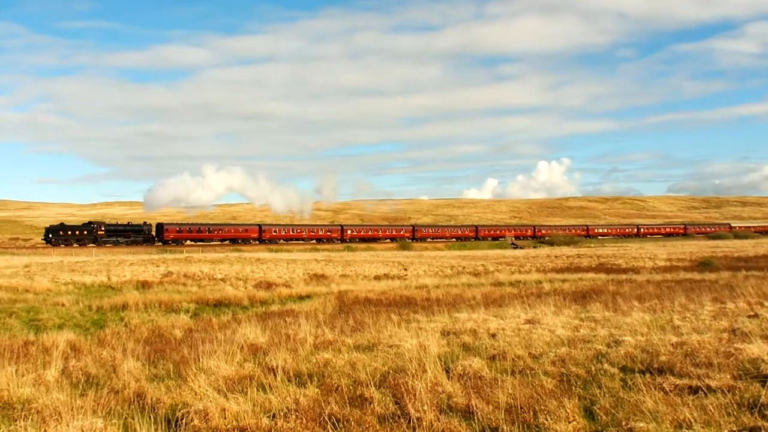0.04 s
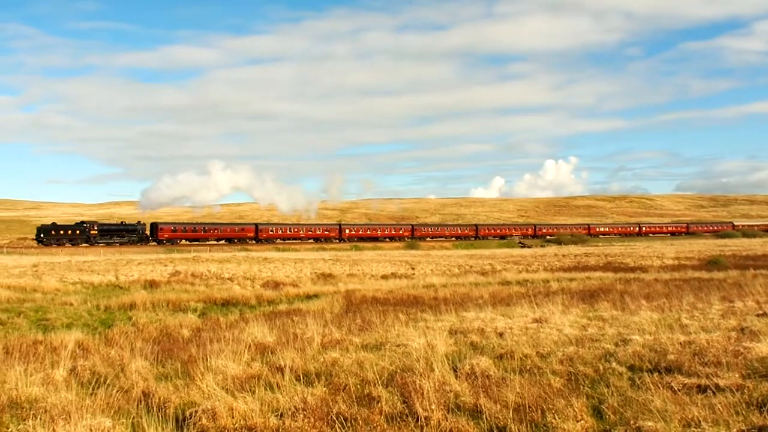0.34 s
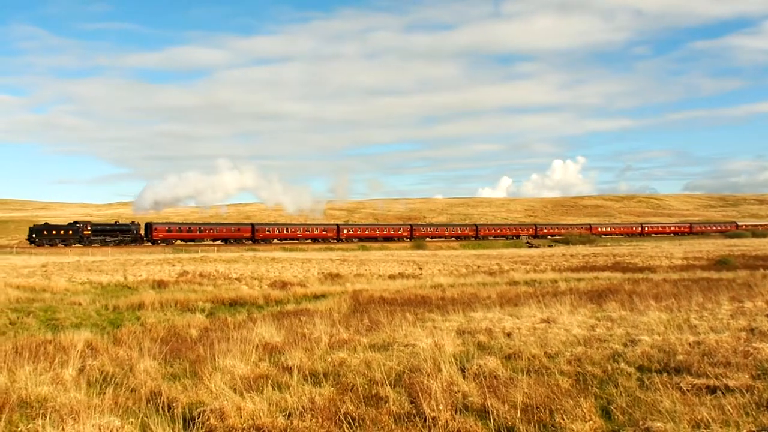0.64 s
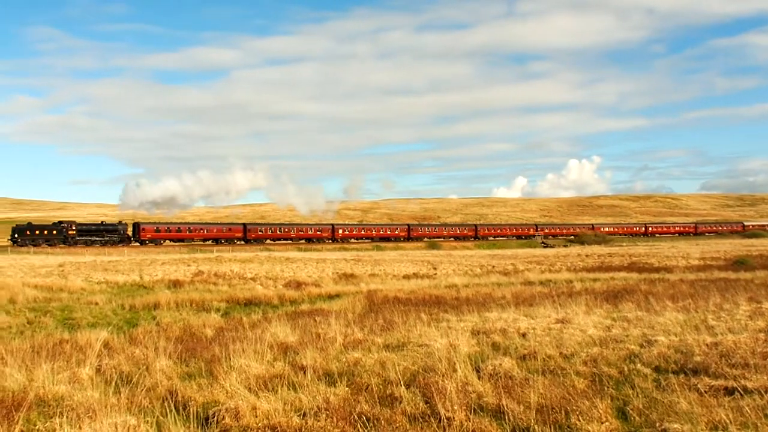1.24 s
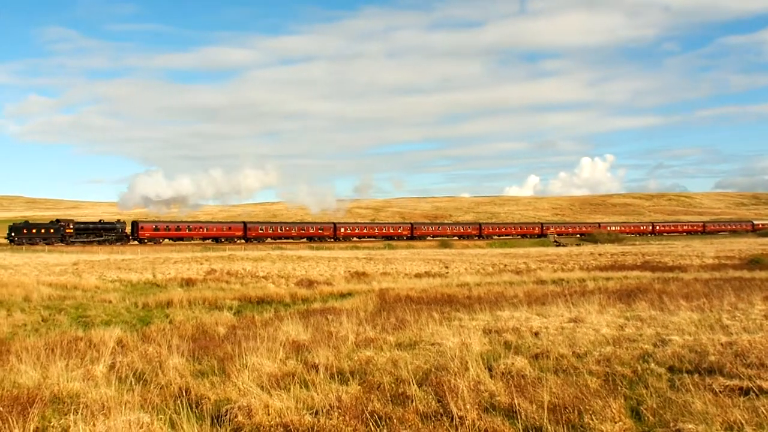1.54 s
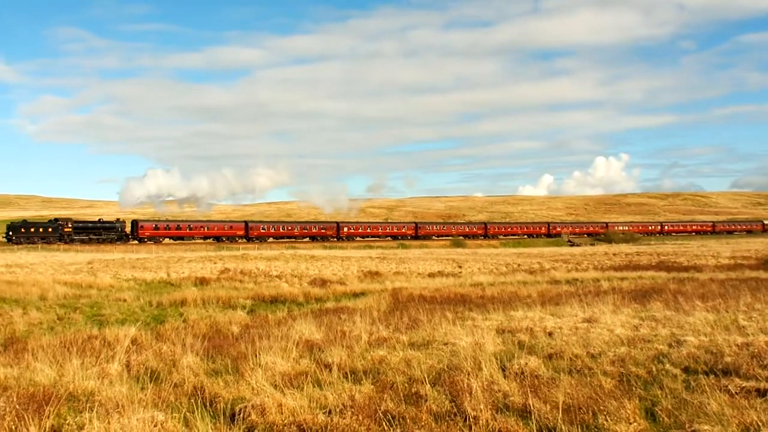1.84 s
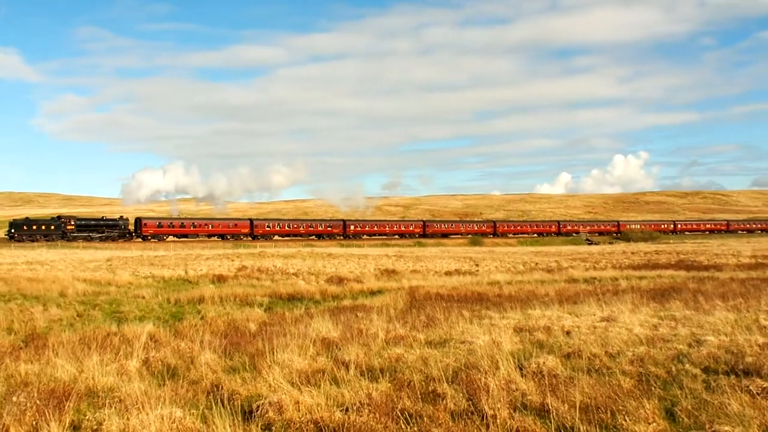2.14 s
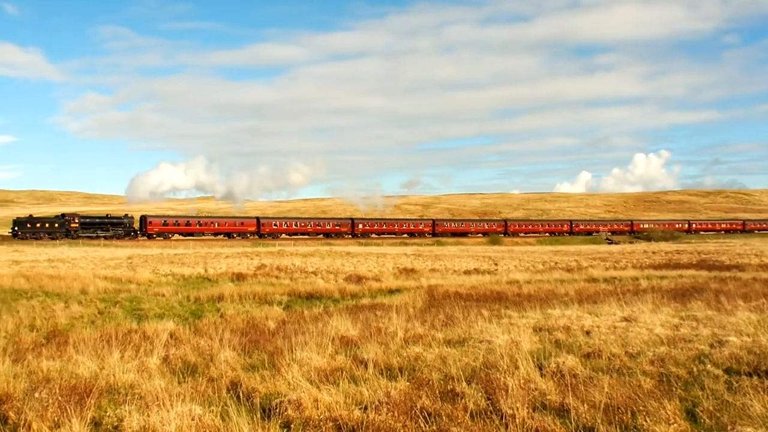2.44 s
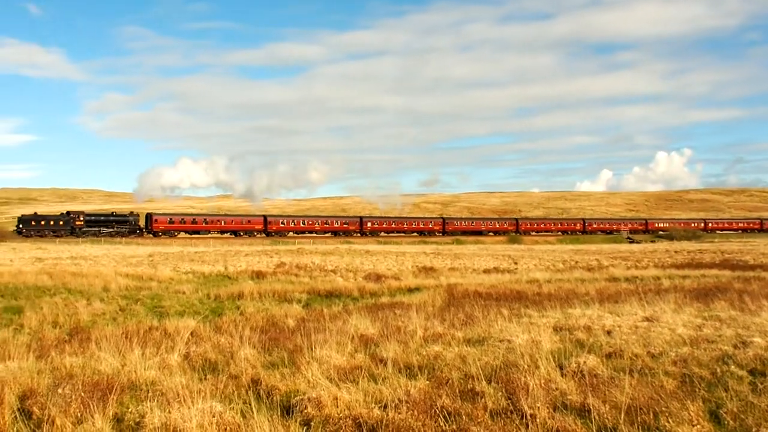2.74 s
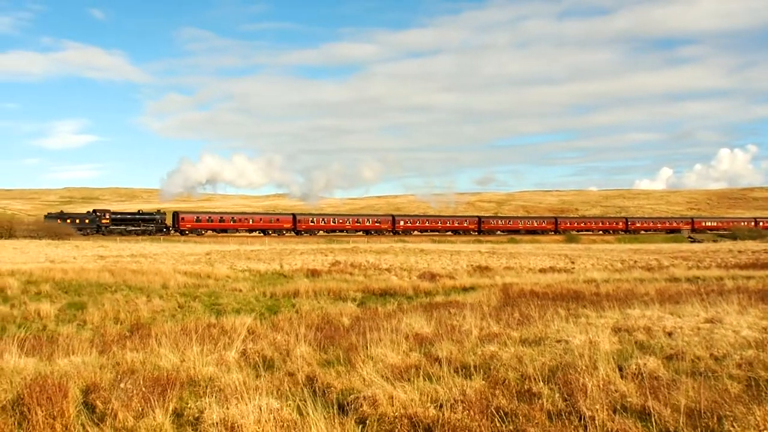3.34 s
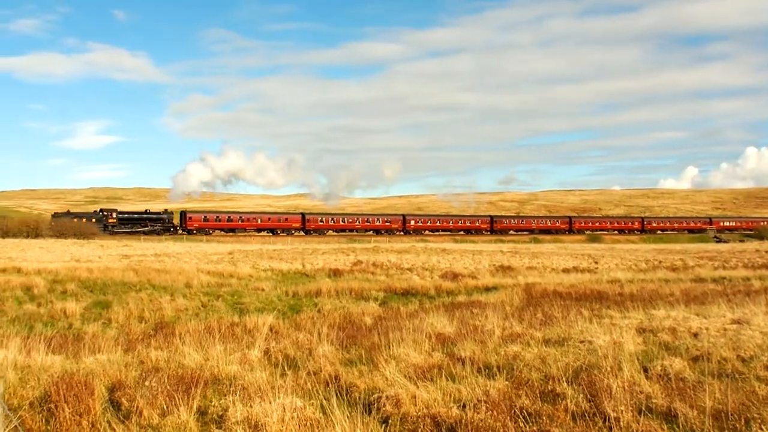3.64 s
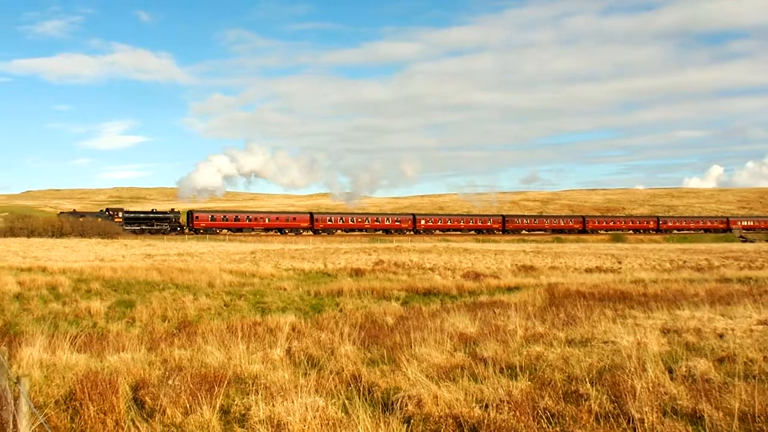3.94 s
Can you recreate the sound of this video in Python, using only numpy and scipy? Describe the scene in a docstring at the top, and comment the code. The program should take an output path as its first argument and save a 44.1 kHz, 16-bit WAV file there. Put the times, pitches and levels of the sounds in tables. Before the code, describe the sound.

Rapid, regular chuffs from a distant steam train carry over open country with a slight echo. Light wind buffets the microphone, then the chuffs get louder, with carriage wheels rumbling softly and steam hissing between beats.

```python
"""A steam locomotive works across open moorland, some way off, at nearly six exhaust beats a second.
Each beat is a chimney blast that swells, crests and dies into a short scatter and a hill echo.
From the start wheels rumble and steam leaks between the beats. Wind brushes the microphone,
hardest at 1.2-1.6 s. From 1.5 s the beats are louder; wheels and leak rise towards the end at 4 s."""
import sys
import numpy as np
from scipy.fft import rfft, irfft
from scipy.io import wavfile
from scipy.ndimage import uniform_filter1d, minimum_filter1d

SR = 44100
rng = np.random.default_rng(int(sys.argv[2]) if len(sys.argv) > 2 else 0)


def persist_wave(psi):
    """Save psi, clipped to +-1, as 16-bit WAV."""
    counts = np.round(np.clip(psi, -1, 1) * 32767).astype(np.int16)
    wavfile.write(sys.argv[1], SR, np.atleast_2d(counts).T)


N = 176400
T_S = np.arange(N) / SR
F_HZ = np.maximum(np.fft.rfftfreq(N, 1 / SR), 1)
BANDS_HZ = 62.5 * 2 ** np.arange(0, 8.1, .5)

# exhaust beats: t/s, rise/s, to crest/s, level/dB, 4 x tone/dB, accent f/Hz, accent gain/dB
BEATS = [(-0.05, 0.003, 0.022, -13.5, -3, -7, -3, -5, 1000.0, 0.0),
         (0.12, 0.0022, 0.03, -20, -1, -4.3, -0.5, -1.5, 500.0, 3.5),
         (0.296, 0.0034, 0.026, -20.5, 2.5, 0.5, 0.5, 2.7, 1170, -6),
         (0.464, 0.0022, 0.035, -14.5, -2.7, -2.5, -5.5, -5.5, 990, -3),
         (0.639, 0.0025, 0.023, -20, 1, -3, 1.3, 3.5, 466, 8),
         (0.814, 0.0079, 0.023, -18, 1.7, 0.2, 1, -1, 4000.0, 4),
         (0.986, 0.0051, 0.029, -21.5, 2, 5, 2, 3.5, 1960, 5),
         (1.155, 0.006, 0.035, -15.5, -3.5, 0.5, -2, 1.2, 4760.0, -9),
         (1.331, 0.0039, 0.025, -15.5, 6.2, -0.6, 4.6, -2, 463, -18.5),
         (1.504, 0.013, 0.028, -10.5, -2, 0.5, 0.5, 2.0, 600, -14),
         (1.676, 0.0038, 0.02, -10.5, 2, -1.7, 8.5, -1, 705, -11.5),
         (1.846, 0.004, 0.032, -8.5, 2, -0.4, -3.5, -1.5, 1140, -13.5),
         (2.018, 0.0045, 0.024, -7, 2.5, -2.4, -2.7, -4, 1460, -11),
         (2.192, 0.0048, 0.024, -8, 0, -2.3, -8, 0, 1650, 11.5),
         (2.363, 0.0059, 0.025, -11, 2.4, 0.5, 6, 4, 2380.0, -2.5),
         (2.534, 0.005, 0.031, -11.0, -2.5, 2.7, 0.5, 0.8, 3320, -8.8),
         (2.712, 0.0076, 0.021, -8, -2.5, -3.1, -1.3, -1.2, 3320, 9.5),
         (2.887, 0.0084, 0.014, -10.5, 1.7, -1, 10, 0.5, 2350, -10.5),
         (3.055, 0.008, 0.028, -14, 4.5, 0, -3.2, -2.5, 1350, 7),
         (3.224, 0.0065, 0.037, -6, -4, -5.4, 0.5, -7.5, 2280, -7),
         (3.399, 0.0034, 0.023, -7, -1.9, 4, -16, 3.5, 2470, 13),
         (3.574, 0.0088, 0.021, -10, 0.5, -4.3, 2.5, 0.8, 714, 8.5),
         (3.744, 0.0036, 0.034, -8, 2, -2.5, 0, 2.5, 1670, -8.7),
         (3.916, 0.0074, 0.031, -7.5, -1, -0.5, 6, -3, 2060, -9.5)]
# centres of the four tone columns: f/Hz
TONE_HZ = [350, 900, 2200, 5500]
# steam jet spectrum: f/Hz, level/dB
JET_SPECTRUM = [(40, -46), (110, -16.5), (165, -29), (195, -15), (220, -8.5), (280, -4.5), (340, -2.5),
                (480, 0), (650, -1.5), (900, 1.5), (1200, -0.5), (1800, -5), (2800, -8), (4700, -13.5),
                (5400, -17), (6400, -19), (7100, -27), (8000, -25.5), (8650, -44.5), (9500, -34.5),
                (10800, -42.5), (12000, -75), (16000, -92)]
# chimney resonances: f/Hz, width/Hz, boost/dB
CHIMNEY_MODES = [(492, 20, 3.5), (725, 9.3, 5)]
# blast decay: f/Hz, rate/(dB/s)
BLAST_DECAY = [(100, 265), (350, 331), (1000, 312), (2500, 375), (6000, 406), (11000, 427)]
# longer paths through moving air: delay/s
AIR_PATHS_S = [.0012, .0017, .0023, .0032, .0043, .0066]
# colour of scatter and hill echo: f/Hz, gain/dB
MOOR_RESPONSE = [(100, -21), (350, -32), (900, -24), (2500, -14), (6000, -37), (11000, -29)]
# wheels on rails: f/Hz, level/dB
WHEEL_SPECTRUM = [(60, -9), (170, -14), (280, -6), (420, -11), (620, -9), (850, -4), (1300, -7),
                  (2000, -10.5), (4000, -29), (8000, -46)]
# wheel envelope: t/s, level/dB
WHEEL_ENVELOPE = [(0, -44.5), (1.2, -41), (2.5, -52), (3.2, -40.5), (4, -38.5)]
# leaking steam: f/Hz, level/dB
LEAK_SPECTRUM = [(500, -8), (2000, -9), (3300, -2.5), (4700, -6.5), (6400, -11), (7100, -13), (8000, -17),
                 (8650, -20), (9600, -24), (11000, -22), (12000, -32), (16000, -53)]
# leak envelope: t/s, level/dB
LEAK_ENVELOPE = [(0, -50.5), (1, -48.5), (1.6, -44), (2.2, -44), (2.8, -47), (3.3, -44.5), (4, -41.5)]
# wind buffeting: f/Hz, level/dB
BUFFET_SPECTRUM = [(15, 4), (26, -3.5), (40, 0.5), (75, -6), (120, -10), (200, -13), (400, -30),
                   (1000, -55)]
# buffet envelope: t/s, level/dB
BUFFET_ENVELOPE = [(0, -42), (.15, -40), (.35, -43), (.55, -45), (.7, -44), (1.05, -47), (1.18, -36),
                   (1.28, -44), (1.41, -32.5), (1.55, -33), (1.75, -48.5), (2.4, -47.5), (2.7, -50),
                   (4, -52)]
# gusts: t/s, half length/s, level/dB
GUST_PEAKS = [(0.567, 0.052, -39), (1.407, 0.046, -36)]
# gust flutter: f/Hz, level/dB
GUST_SPECTRUM = [(40, -13), (100, 3), (150, -5), (230, -6.5), (320, -31), (800, -54)]
# steady hiss: f/Hz, level/dB
HISS_SPECTRUM = [(2000, 5), (11000, -5), (12500, 3), (15500, 6)]
# stereo width: f/Hz, side re mid/dB
STEREO_WIDTH = [(30, -39), (120, -30), (500, -36.5), (1400, -24.5), (2800, -15.5), (5600, -14),
                (10000, -11), (14000, -2)]


def exhaust(level_db=-2.72, sputter_db=0.81, sputter_hz=350, patchy_db=0.44, patchy_hz=4.7):
    """Turbulent jet through the chimney, let out beat by beat, plus its reflections off the moor."""
    chimney_db = sum(db / (1 + (2 * (F_HZ - hz) / width_hz) ** 2) for hz, width_hz, db in CHIMNEY_MODES)
    spectrum_db = at_hz(JET_SPECTRUM, F_HZ) + chimney_db
    jet_bands = split_bands(air_paths(noise(spectrum_db)))
    far_bands = split_bands(noise(spectrum_db))
    mix = 0
    for hz, jet, far in zip(BANDS_HZ, jet_bands, far_bands):
        direct, reflected = beat_envelopes(hz)
        jet = jet * from_db(-patchy_db * drift(patchy_hz))   # moving air, each band on its own
        far = far * from_db(at_hz(MOOR_RESPONSE, hz))
        mix = mix + jet * direct + far * reflected
    return mix * from_db(level_db + sputter_db * drift(sputter_hz))


def beat_envelopes(hz, scatter_delay_s=0.048, scatter_t60_s=0.15, hill_delay_s=0.091):
    """Direct and reflected gain in one band; beats add in power."""
    t_s = T_S[::20]
    decay_db_s = at_hz(BLAST_DECAY, hz)
    direct = reflected = 0
    for open_s, rise_s, crest_s, db, *tone_db, accent_hz, accent_db in BEATS:
        age_s = t_s - open_s
        band_db = db + beat_colour_db(hz, tone_db, accent_hz, accent_db)
        direct += (from_db(band_db) * blast(age_s, rise_s, crest_s, decay_db_s)) ** 2
        scatter_db = -21 + .2 * (db + 21)   # swings less than the beat
        scatter = from_db(scatter_db) * blast(age_s - scatter_delay_s, rise_s, 0, 60 / scatter_t60_s)
        hill_db = db - 3 - 4.5 * open_s   # fades as the engine moves on
        hill_echo = from_db(hill_db) * blast(age_s - hill_delay_s, rise_s, crest_s, decay_db_s)
        reflected += scatter ** 2 + hill_echo ** 2
    return np.interp(T_S, t_s, np.sqrt(direct)), np.interp(T_S, t_s, np.sqrt(reflected))


def blast(age_s, rise_s, crest_s, decay_db_s, linger_s=0.014):
    """Valve opens in an S; pressure climbs to a rounded crest, then falls linearly in dB."""
    valve = .5 * (1 + np.tanh(age_s / rise_s / 2))
    off_crest_s = np.hypot(age_s - crest_s, linger_s) - linger_s
    return valve * from_db(-decay_db_s * off_crest_s)


def beat_colour_db(hz, tone_db, accent_hz, accent_db, half_width_oct=0.37):
    """Broad tone of a beat plus one band that swells or fades on the way."""
    broad_db = np.interp(np.log(hz), np.log(TONE_HZ), tone_db)
    return broad_db + accent_db * np.exp(-(np.log2(hz / accent_hz) / half_width_oct) ** 2)


def air_paths(jet, path_db=-13.5, fade_hz=6.7):
    """Late copies through moving air fade in and out: a shifting hollow colour; rms 1."""
    late = sum(drift(fade_hz) * np.roll(jet, int(delay_s * SR), axis=-1) for delay_s in AIR_PATHS_S)
    mix = jet + from_db(path_db) * late
    return mix / mix.std()


def wheels():
    """Carriages roll on the rails with an uneven roar."""
    return wavering_noise(WHEEL_SPECTRUM, WHEEL_ENVELOPE, waver_db=2.5, waver_hz=20)


def steam_leak():
    """Steam hisses from the engine, wavering in the breeze."""
    return wavering_noise(LEAK_SPECTRUM, LEAK_ENVELOPE, waver_db=1.2, waver_hz=7)


def wind(hiss_db=-64.5):
    """Low buffeting and two fluttering gusts on the microphone, over faint hiss."""
    buffet = wavering_noise(BUFFET_SPECTRUM, BUFFET_ENVELOPE, waver_db=1.8, waver_hz=12)
    gusts = sum(from_db(db) * np.exp(-((T_S - t_s) / half_s) ** 2) for t_s, half_s, db in GUST_PEAKS)
    flutter = gusts * noise(at_hz(GUST_SPECTRUM, F_HZ))
    hiss = from_db(hiss_db) * noise(at_hz(HISS_SPECTRUM, F_HZ))
    return buffet + flutter + hiss


def wavering_noise(spectrum, envelope, waver_db, waver_hz):
    """Coloured noise on a level curve, with random waver."""
    level_db = np.interp(T_S, *np.transpose(envelope))
    return noise(at_hz(spectrum, F_HZ)) * from_db(level_db + waver_db * drift(waver_hz))


def noise(spectrum_db):
    """Coloured noise, near mono, wider in the treble; rms 1."""
    mid, side = rfft(rng.standard_normal((2, N))) * from_db(spectrum_db)
    side = side * from_db(at_hz(STEREO_WIDTH, F_HZ))
    stereo = irfft(np.array([mid + side, mid - side]), N)
    return stereo / stereo.std()


def drift(corner_hz):
    """Low-passed random signal; std 1."""
    slow = irfft(rfft(rng.standard_normal(N)) / (1 + (F_HZ / corner_hz) ** 2), N)
    return slow / slow.std()


def split_bands(x):
    """Half-octave bands that sum to x."""
    spectrum = rfft(x)
    weights = [np.interp(np.log(F_HZ), np.log(BANDS_HZ), row) for row in np.eye(len(BANDS_HZ))]
    return [irfft(spectrum * weight, N) for weight in weights]


def at_hz(table, hz):
    """Table lookup on a log-frequency axis."""
    knots_hz, values = np.transpose(table)
    return np.interp(np.log(hz), np.log(knots_hz), values)


def from_db(db):
    """dB to gain."""
    return 10 ** (np.asarray(db) / 20)


def scene():
    """Train and open air."""
    return exhaust() + wheels() + steam_leak() + wind()


def record(dry, ceiling_db=-2.7, limiter_s=.002, cutoff_hz=15850):
    """Fast peak limiter, then a steep low-pass."""
    span, fft_size = int(limiter_s * SR), 2 * N
    gain = np.minimum(1, from_db(ceiling_db) / (np.abs(dry).max(axis=0) + 1e-9))
    limited = dry * uniform_filter1d(minimum_filter1d(gain, span), span)
    passband = np.fft.rfftfreq(fft_size, 1 / SR) < cutoff_hz
    return irfft(rfft(limited, fft_size) * passband, fft_size)[:, :N]


dry = scene()
out = record(dry)
persist_wave(out)
```